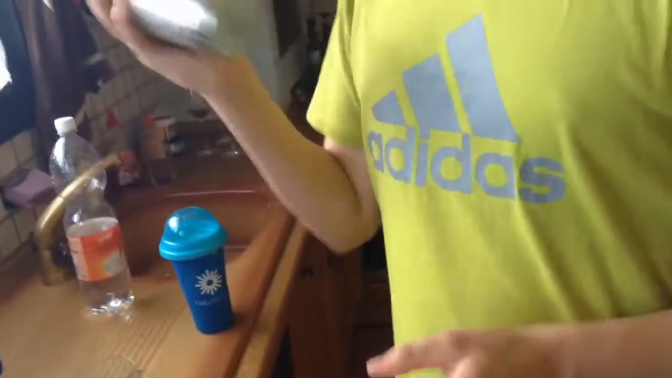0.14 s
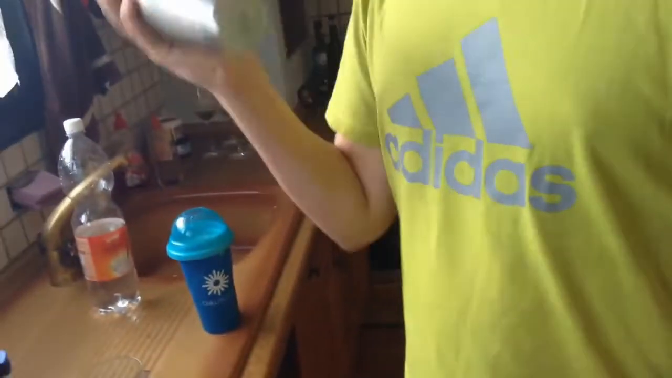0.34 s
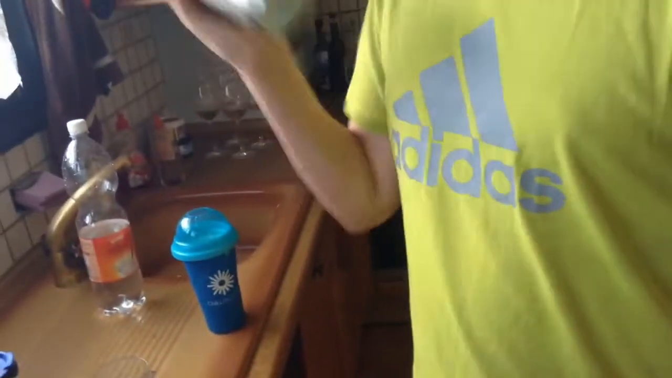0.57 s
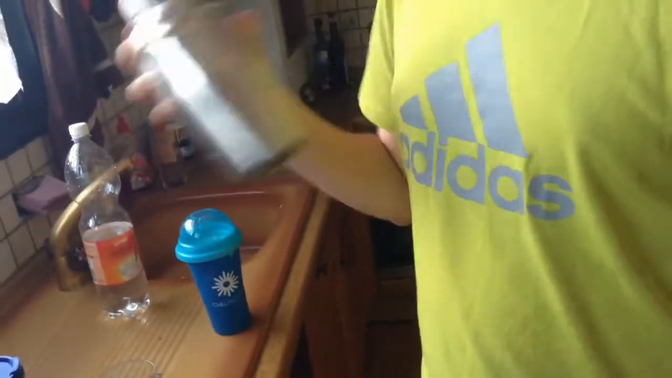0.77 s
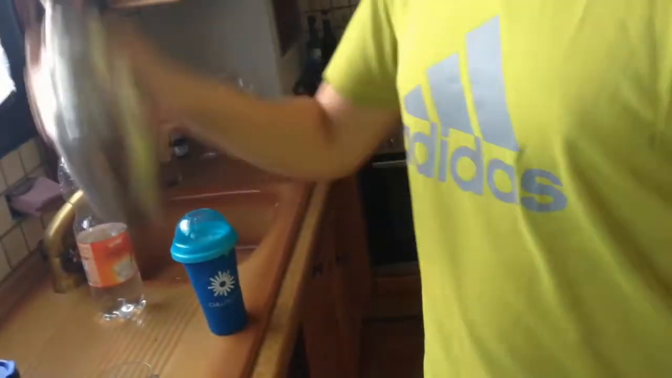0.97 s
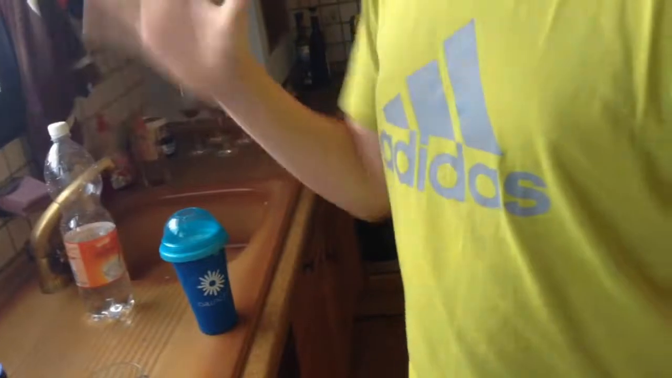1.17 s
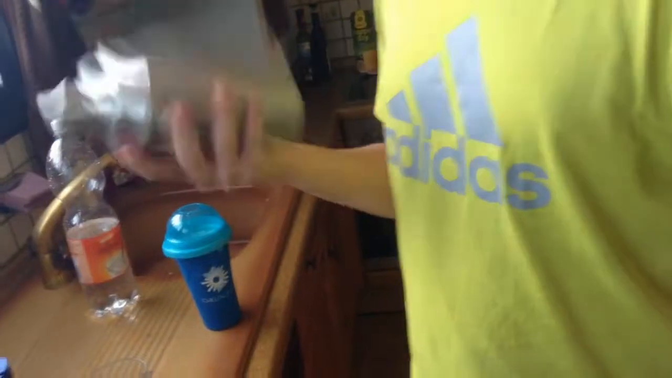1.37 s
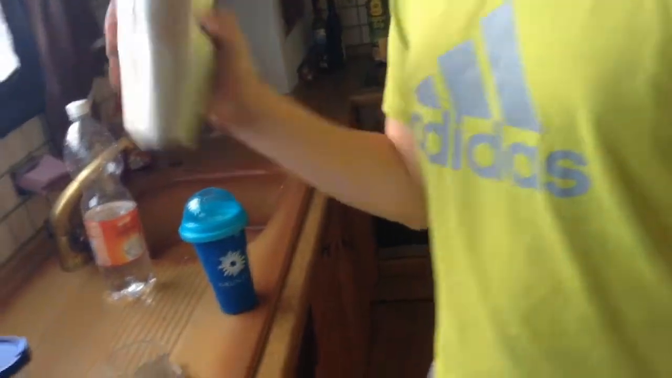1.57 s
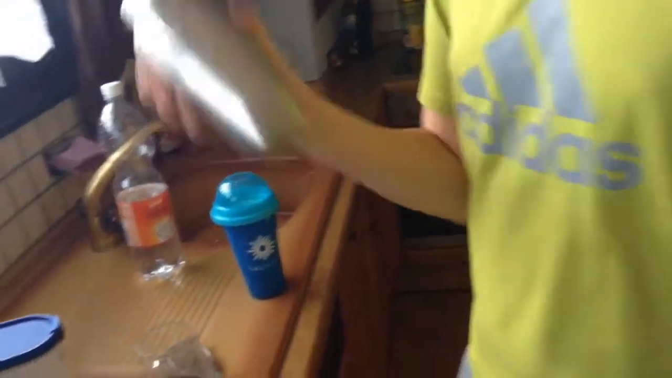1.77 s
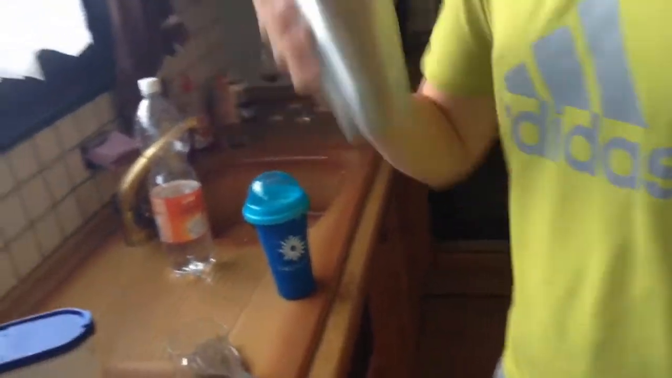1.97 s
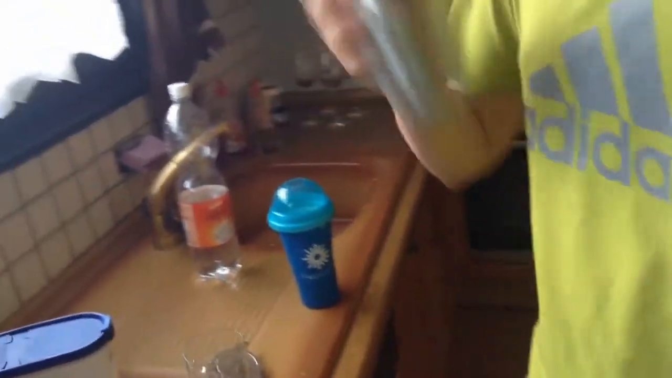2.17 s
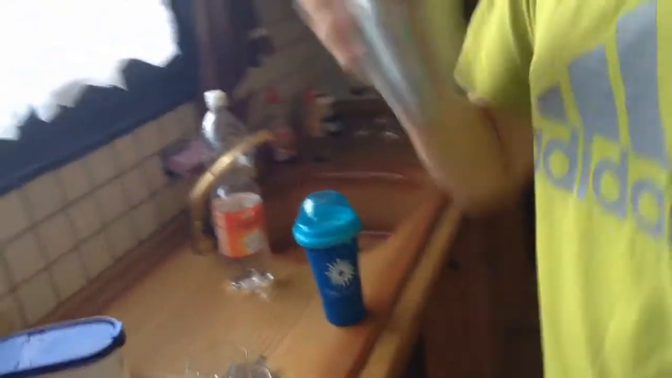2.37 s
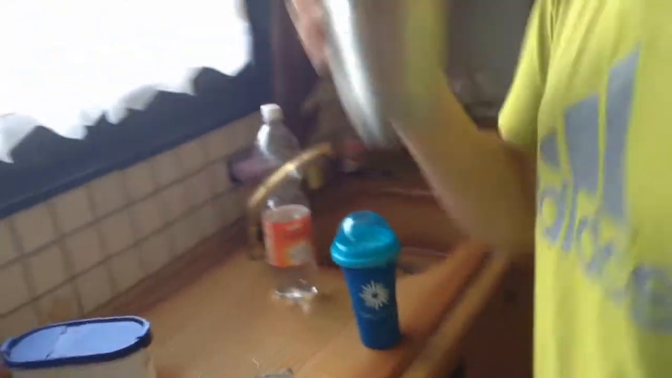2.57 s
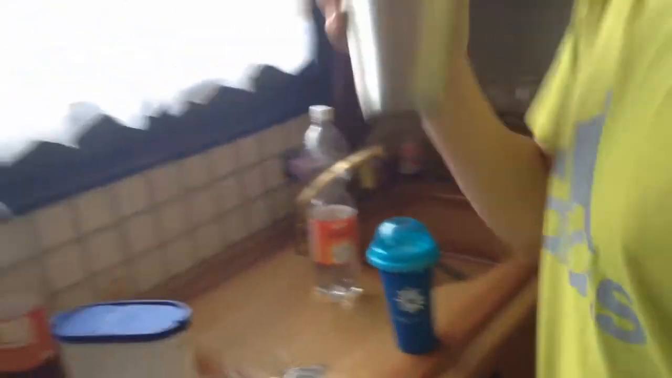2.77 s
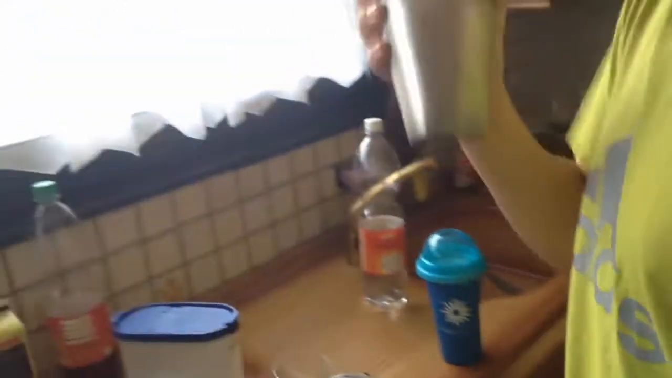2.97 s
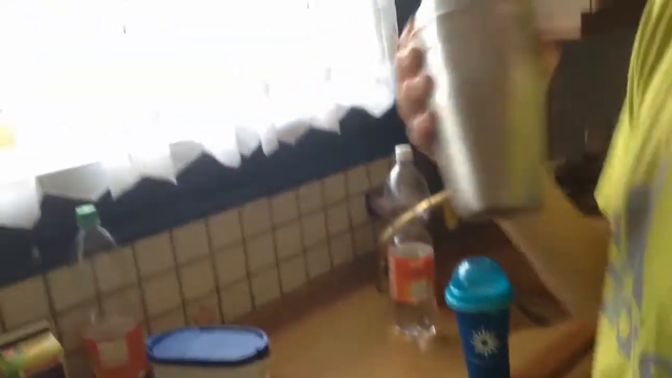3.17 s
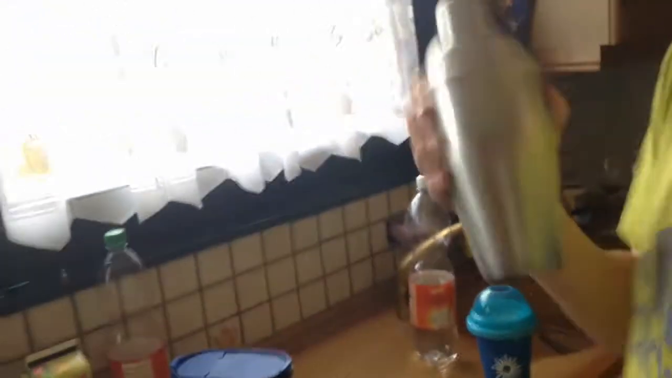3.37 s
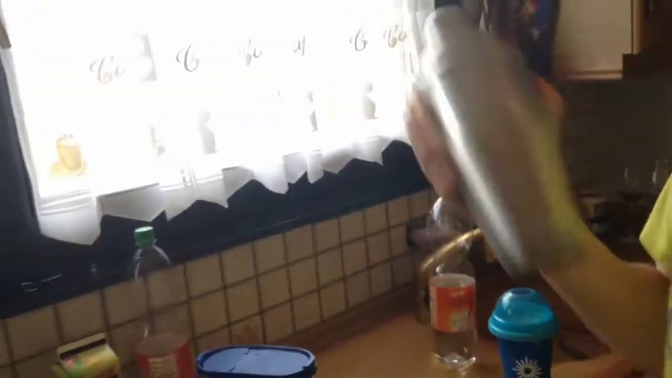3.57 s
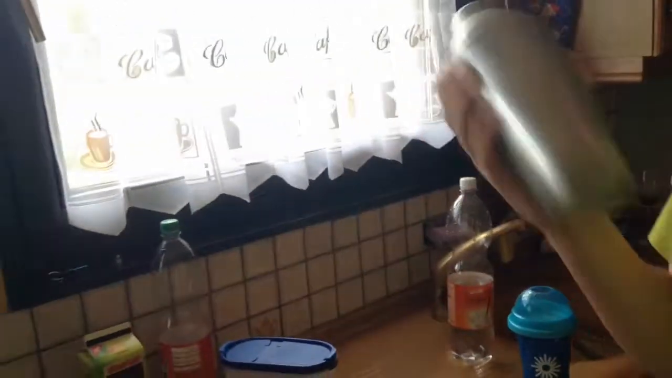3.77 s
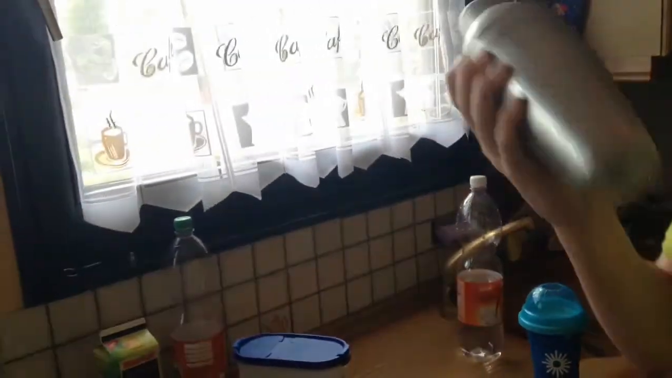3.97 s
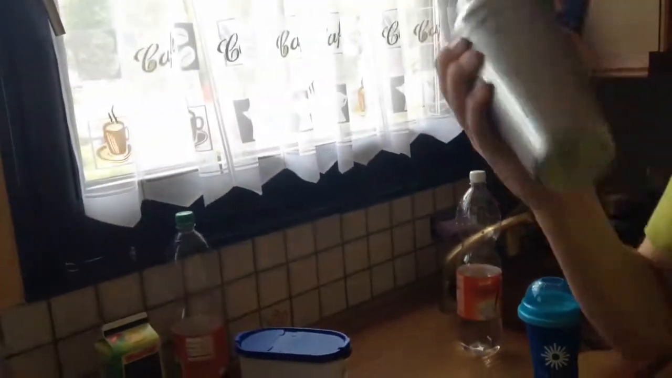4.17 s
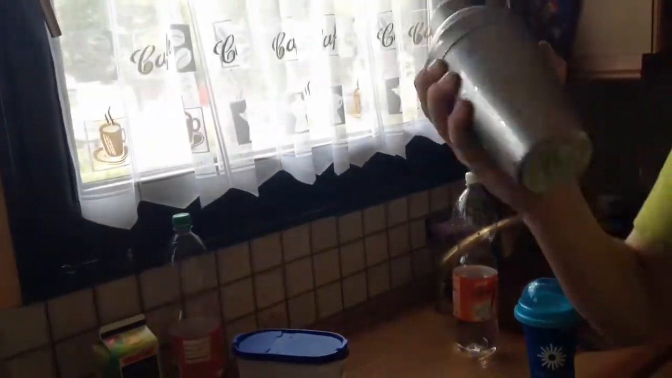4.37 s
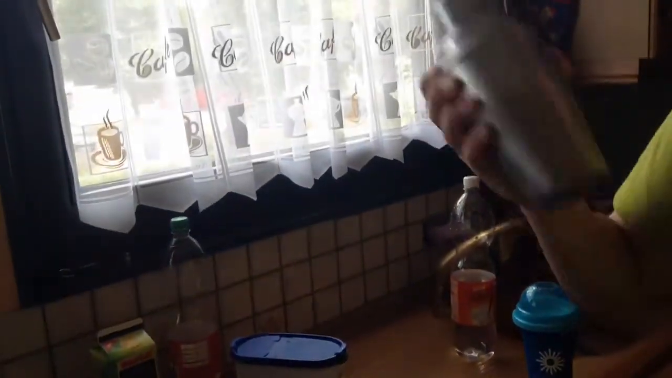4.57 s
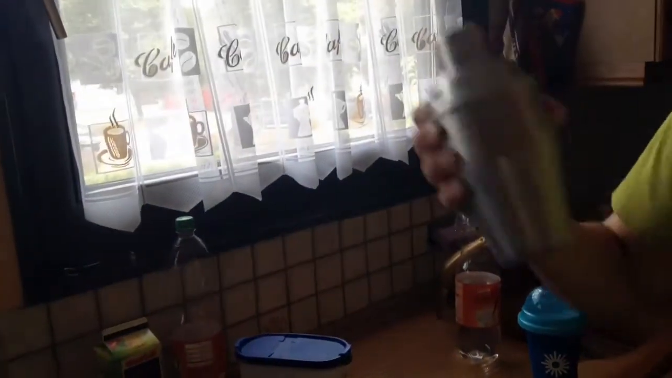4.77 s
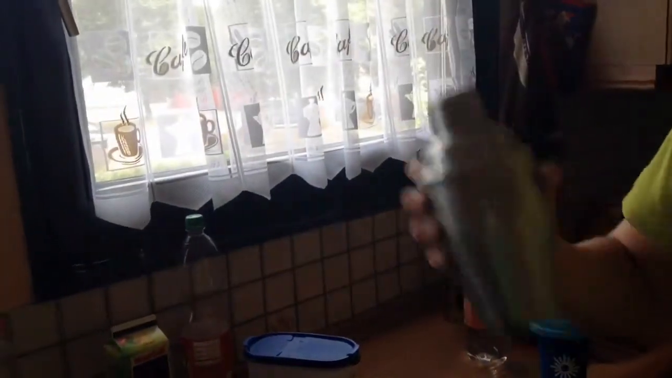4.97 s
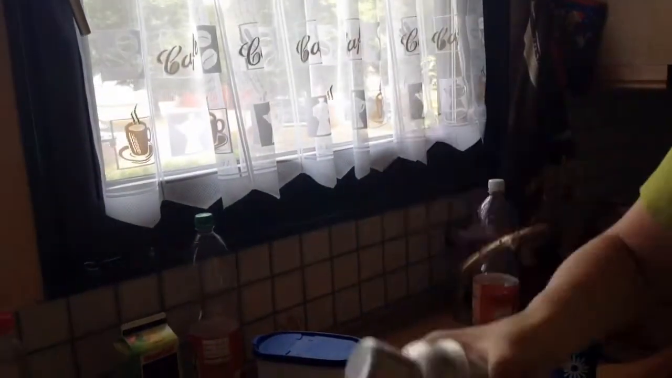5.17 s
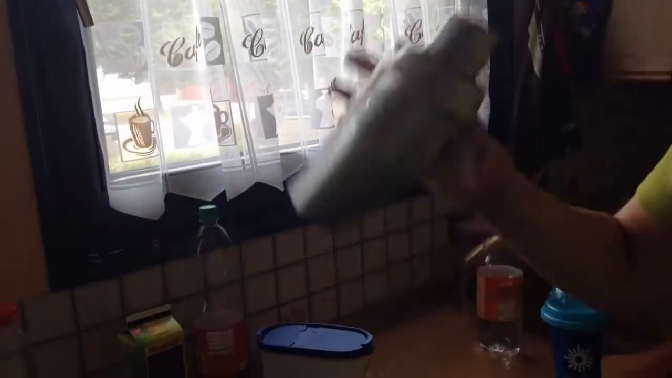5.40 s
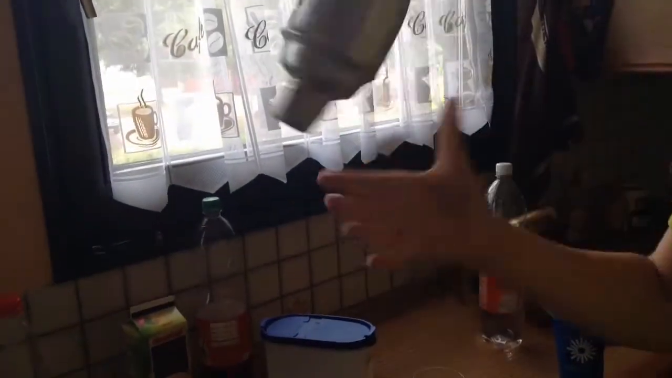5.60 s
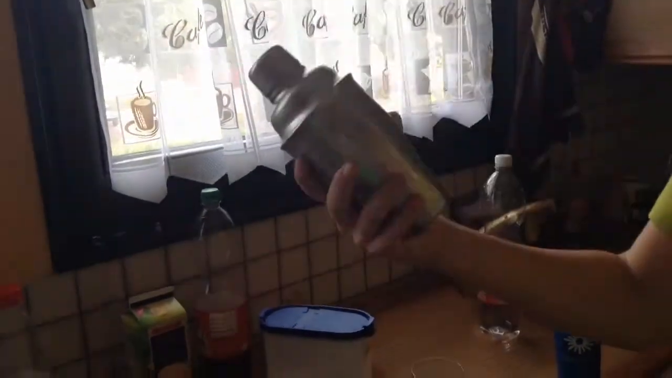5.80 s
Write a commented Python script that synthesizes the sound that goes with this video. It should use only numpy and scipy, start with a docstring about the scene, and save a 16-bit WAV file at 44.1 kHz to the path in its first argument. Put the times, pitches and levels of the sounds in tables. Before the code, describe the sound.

Close up in a small tiled kitchen, ice cubes knock rapidly inside a hand-held steel shaker, with dull short rings, bright slushy hiss and faint sloshing. The rattle drops away just after one second, a soft palm catch follows, then shaking resumes harder and denser. It stops near five and a half seconds, and a last catch lands with a clack. The microphone is near, thin in the bass.

```python
"""A small tiled kitchen, where ice cubes are thrown about in a hand-held steel cocktail shaker.
Each blow rings the hand-damped wall for a few milliseconds as short decaying sines and stirs up lesser
knocks and bursts of bright noise, the slush. At the end of a stroke the load lands on the base (low modes)
and sloshes (flickering noise). Twice the shaker is caught in the palm with a soft noise thump.
A tile echo, room echoes and a faint room tone surround it; a limiter holds the peaks."""
import sys
import numpy as np
from scipy import signal
from scipy.io import wavfile
from scipy.ndimage import uniform_filter1d, minimum_filter1d

SR = 44100
rng = np.random.default_rng(int(sys.argv[2]) if len(sys.argv) > 2 else 0)


def generate_wav(signal):
    """Clip the signal to [-1, 1] and save it as 16-bit WAV at the path in sys.argv[1]."""
    frames = np.transpose(np.atleast_2d(signal))
    scaled = np.clip(frames, -1, 1) * 32767
    pcm = np.round(scaled).astype(np.int16)
    wavfile.write(sys.argv[1], SR, pcm)


N = 257544


def from_db(db):
    """Amplitude factor of a level in dB."""
    return 10 ** (np.asarray(db) / 20)


def power_db(power):
    """Level in dB of a power."""
    return 10 * np.log10(power)


def rms_one(x):
    """Scale to rms 1."""
    return x / np.sqrt(np.mean(x ** 2) + 1e-20)


def at_hz(points, hz):
    """Read a (Hz, value) table on a logarithmic frequency axis."""
    table_hz, values = np.transpose(points)
    return np.interp(np.log(hz), np.log(table_hz), values)


def filtered(x, order, hz, kind):
    """Butterworth filter."""
    return signal.sosfilt(signal.butter(order, hz, kind, fs=SR, output="sos"), x)


def bands(low_hz, size):
    """Half-octave bands of noise with their centres; neighbours come from unrelated draws."""
    edges_hz = low_hz * 2 ** np.arange(0, np.log2(14500 / low_hz), 0.5)
    white = rng.standard_normal((2, size))
    for k, edge_hz in enumerate(edges_hz):
        band = filtered(white[k % 2], 2, [edge_hz, edge_hz * np.sqrt(2)], "band")
        yield edge_hz * 2 ** 0.25, band


def drift(rate_hz):
    """Slow chance: straight lines between random knots of spread 1, rate_hz knots a second."""
    knots = rng.standard_normal(int(N / SR * rate_hz) + 2)
    return np.interp(np.arange(N) / SR * rate_hz, np.arange(len(knots)), knots)


def coloured(spectrum, patchy_db, rate_hz):
    """Noise of a given colour whose bands flicker, partly together; rms 1."""
    together = drift(rate_hz)
    total = 0
    for hz, band in bands(60.0, N):
        flicker_db = patchy_db * (together + drift(rate_hz))
        total = total + from_db(at_hz(spectrum, hz) + flicker_db) * band
    return rms_one(total)


def dying(events, level_db, t60_s, way=1):
    """Power that jumps at every event and dies away after it (way -1: before it)."""
    kicks = np.zeros(N) + 1e-18
    for s, peak_db in events:
        kicks[int(s * SR)] += from_db(2 * (peak_db + level_db))
    return signal.lfilter([1], [1, -from_db(-120 / (t60_s * SR))], kicks[::way])[::way]


# Room tone colour. Each row: frequency in Hz, relative density in dB per Hz.
ROOM_TONE_COLOUR = [(60, -19), (120, -2.5), (350, -6.5), (1000, -7), (2000, 2.5), (5000, -25), (15000, -53)]


def room_tone():
    """Steady background noise, strongest around 2 kHz, with slowly flickering bands."""
    return from_db(-55.5) * coloured(ROOM_TONE_COLOUR, patchy_db=2.5, rate_hz=8.0)


# Decay of the kitchen. Each row: frequency in Hz, t60 in s.
KITCHEN_DECAY = [(250, 0.25), (700, 0.15), (2000, 0.52), (4000, 0.33), (9000, 0.31), (15000, 0.11)]


def kitchen(x, patterns=7):
    """Dense noise echoes dying band by band; the moving shaker excites ever another echo pattern."""
    t = np.arange(SR // 2) / SR
    shares = np.array([from_db(29.3 * drift(16.0)) for _ in range(patterns)])
    shares /= np.sqrt(np.sum(shares ** 2, axis=0))
    out = 0
    for share in shares:
        tail = sum(band * from_db(-60 * t / at_hz(KITCHEN_DECAY, hz)) for hz, band in bands(90.0, len(t)))
        tail = tail * np.clip((t - 0.0015) / 0.003, 0, 1)   # echoes fade in from 1.5 to 4.5 ms
        tail = tail / np.sqrt(np.sum(tail ** 2))
        out = out + signal.oaconvolve(share * x, tail)[:N]
    return out


def tile_echo(x):
    """One echo from the nearest tiled wall."""
    lag = int(0.005 * SR)
    return from_db(-13.5) * np.concatenate([np.zeros(lag), x[:-lag]])


# Shaker caught in the palm. Each row: start in s, level in dB, t60 in s.
PALM_CATCHES = [(1.368, -38.5, 0.21), (5.745, -35.5, .35)]
# Passband of the thump: lower and upper edge in Hz.
PALM_BAND_HZ = [160, 270]


def catches():
    """Skin on steel: a soft lumpy thump of decaying low noise."""
    t = np.arange(N) / SR
    low = rms_one(filtered(rng.standard_normal(N), 2, PALM_BAND_HZ, "band"))
    envelope = 0
    for s, level_db, t60_s in PALM_CATCHES:
        envelope = envelope + (t > s) * from_db(level_db - 60 * np.abs(t - s) / t60_s)
    return low * envelope


# Slosh colour. Each row: frequency in Hz, relative density in dB per Hz.
SLOSH_COLOUR = [(100, -38), (160, -26.5), (240, -11), (400, -13.5), (700, 1.5), (1100, -8.5), (1800, -18)]
SPLASH_DB, SPLASH_T60_S = -18, 0.32   # over the landing's strength


def slosh(stroke_db):
    """Flickering noise of the moving load; it swells at every landing and dies away."""
    level_db = power_db(from_db(2 * stroke_db) + dying(BASE_LANDINGS, SPLASH_DB, SPLASH_T60_S))
    return from_db(level_db) * coloured(SLOSH_COLOUR, patchy_db=4.0, rate_hz=31.0)


# Slush colour. Each row: frequency in Hz, relative density in dB per Hz.
SLUSH_COLOUR = [(1200, -27.5), (3000, 4), (5500, -1.5), (8000, 4.5), (11000, -5), (14000, -2)]
TICKS_PER_S, TICK_SPREAD_DB, TICK_T60_S = 810, 7, 0.0095
SPRAY_DB, SPRAY_T60_S = -0.5, 0.19   # chips thrown up by a blow, over its crack
SLUSH_DB = -5.5   # over the rattle


def slush(vigour_db):
    """Ice chips tick on the steel: short bursts of bright noise, more after a blow's crack."""
    spray = dying(np.array(CUBE_BLOWS)[:, [0, 4]], SPRAY_DB, SPRAY_T60_S)
    level_db = power_db(from_db(2 * vigour_db) + spray) + SLUSH_DB
    sizes = from_db(TICK_SPREAD_DB * np.minimum(rng.exponential(1, N), 4.0))
    ticks = sizes * (rng.random(N) < TICKS_PER_S / SR)
    bursts = signal.lfilter([1], [1, -from_db(-60 / (TICK_T60_S * SR))], ticks)
    return from_db(level_db) * rms_one(bursts * coloured(SLUSH_COLOUR, patchy_db=4.0, rate_hz=33.0))


# Upper ring modes. Each row: frequency in Hz, relative level in dB, t60 in s.
UPPER_MODES = [(3085, -4.5, 0.015), (4000, 0, 0.015), (4515, 0.5, 0.0045)]
# Crack modes. Each row: frequency in Hz, relative level in dB, t60 in s.
CRACK_MODES = [(5490, -5.5, 0.0085), (7840, -3.5, 0.0052), (9630, -5, 0.0032), (13400, 15, 0.00072),
               (14900, -11, 0.0098)]
# Body thud modes. Each row: frequency in Hz, relative level in dB, t60 in s.
THUD_MODES = [(262, -24, 0.0072), (720, -7, 0.029), (1020, -2, 0.0011), (1340, 4, 0.0045)]
WALL_T60_S, CONTACT_S = 0.013, 0.00012   # CONTACT_S: time constant of the attack


def shaker(hits, scatter_db, detune):
    """Every hit rings all modes; grip and load shift their pitch and strength from hit to hit."""
    s, wall_hz, *group_db = np.transpose(hits)   # groups: wall, upper, crack, thud
    at = (s * SR).astype(int)
    out = np.zeros(N + SR)
    modes = [(0, (wall_hz, 0, WALL_T60_S))]
    for group, table in enumerate((UPPER_MODES, CRACK_MODES, THUD_MODES), 1):
        modes += [(group, mode) for mode in table]
    luck = rng.standard_normal((len(at), len(modes), 3))   # strength, pitch, phase
    luck[:, 0, :2] = 0   # wall ring exactly as given
    for k, (group, (hz, level_db, t60_s)) in enumerate(modes):
        n = np.arange(int(t60_s * SR))
        strength = from_db(group_db[group] + level_db + scatter_db * luck[:, k, 0])
        turn = 2 * np.pi * hz * np.exp(detune * luck[:, k, 1]) / SR
        shape = from_db(-60 * n / len(n)) * (1 - np.exp(-n / (CONTACT_S * SR)))
        phase = 2 * np.pi * luck[:, k, 2:]
        rings = strength[:, None] * shape * np.sin(turn[:, None] * n + phase)
        out += np.bincount((at[:, None] + n).ravel(), rings.ravel(), len(out))
    return out[:N]


# Colour of a small knock: relative levels in dB of wall, upper ring, crack, thud.
KNOCK_GROUPS_DB = [7, 0, -13.5, -13]
KNOCKS_PER_S, KNOCK_SPREAD_DB, KNOCK_HZ = 150, 5.5, 2097
STIR_DB, STIR_T60_S = -13.5, 0.12   # knocks a blow leaves behind, over its wall ring
KNOCK_DB = -9.5   # over the rattle


def knocks(vigour_db):
    """Small knocks at random moments, many weak and a few strong, louder after a blow."""
    stir = dying(np.array(CUBE_BLOWS)[:, :2], STIR_DB, STIR_T60_S)
    level_db = power_db(from_db(2 * vigour_db) + stir) + KNOCK_DB
    s = np.flatnonzero(rng.random(N) < KNOCKS_PER_S / SR) / SR
    luck = rng.standard_normal((len(s), 5))
    size_db = KNOCK_SPREAD_DB * np.minimum(rng.exponential(1, (len(s), 1)), 1.9)
    wall_hz = KNOCK_HZ * np.exp(0.063 * luck[:, 0])
    group_db = size_db + KNOCK_GROUPS_DB + 8.2 * luck[:, 1:]
    hits = np.column_stack([s, wall_hz, group_db])
    return from_db(level_db) * rms_one(shaker(hits, scatter_db=3.0, detune=0.043))


# Load landing on the base at the end of a stroke. Each row: start in s, relative strength in dB.
BASE_LANDINGS = [(0.065, -14), (0.145, -37), (0.272, -16.5), (0.73, -17), (0.97, -24.5), (1.371, -24),
                 (1.469, -19.5), (1.627, -18.5), (1.775, -19.5), (1.914, -17), (2.168, -35), (2.281, -19.5),
                 (2.329, -18), (2.462, -32), (2.592, -9.5), (2.784, -17.5), (2.867, -13.5), (3.215, -15),
                 (3.398, -15.5), (3.665, -36), (4.266, -21.5), (4.379, -31), (4.474, -32), (4.547, -26),
                 (4.765, -27), (5.15, -40), (5.747, -11.5), (5.761, -17.5)]
BASE_LAG_S, LANDING_DB = 0.00201, 1.5   # LANDING_DB: over the strength column


def landings():
    """The whole load on the heavy base sounds the low modes only, a little late."""
    silent_db = -np.inf
    hits = [(s + BASE_LAG_S, KNOCK_HZ, silent_db, silent_db, silent_db, strength_db + LANDING_DB)
            for s, strength_db in BASE_LANDINGS]
    return shaker(hits, scatter_db=3.0, detune=0.024)


# Cube on wall. Each row: start in s, wall ring in relative dB, wall ring in Hz,
# upper ring in relative dB, crack in relative dB.
CUBE_BLOWS = [(0.0024, -12.5, 2120, -19, -19.5), (0.0308, -6.5, 2060, -19, -21),
              (0.0593, -10.5, 2320, -28, -18.5), (0.1482, -12, 1900, -24, -24),
              (0.1986, -6, 2040, -14.5, -24), (0.2374, -7.5, 2110, -21, -18), (0.2727, -10, 2040, -24, -13),
              (0.402, -9, 2050, -27.5, -24), (0.4599, -13, 2050, -28, -19.5), (0.488, -8, 2000, -26, -21),
              (0.5215, -6.5, 2140, -35, -23), (0.5796, -11.5, 1900, -16, -17),
              (0.6072, -15, 1920, -15.5, -13.5), (0.6336, -9, 2040, -22, -14),
              (0.6764, -11.5, 2010, -36, -21), (0.7064, -5.5, 2080, -21, -22), (0.7308, 1, 2010, -16, -16),
              (0.8347, -17, 2090, -26, -17.5), (0.9021, -12.5, 2010, -18, -17),
              (0.9563, -11.5, 2030, -24, -17), (0.9704, -12, 2160, -23, -23), (1.0171, -17, 2090, -33, -24),
              (1.0805, -18.5, 2130, -28, -33), (1.1836, -38, 2000, -44, -65), (1.3332, -34, 2040, -56, -64),
              (1.3705, -26.5, 1800, -35, -25.5), (1.3849, -24, 1770, -33, -30),
              (1.4066, -24.5, 1920, -35, -25.5), (1.4709, -22, 2120, -34, -28),
              (1.4763, -9.5, 2000, -33, -33), (1.6182, -17, 2100, -31, -26.5),
              (1.6302, -5.5, 2110, -35, -20.5), (1.6624, -26, 2070, -29, -18.5),
              (1.725, -14, 2190, -27, -18), (1.7734, -5, 2270, -19, -15), (1.8158, -9, 1950, -24, -33),
              (1.9158, -10, 1810, -18, -14.5), (1.9516, -6, 2470, -13, -7.5),
              (1.9637, -0.5, 2060, -17, -11.5), (1.9921, -5, 2140, -14, -17),
              (2.1064, -5.5, 2170, -27, -14.5), (2.1264, -11, 2130, -42, -9), (2.173, -3, 2050, -28, -26),
              (2.2022, -9, 2310, -10, -18), (2.283, -2.5, 2130, -13, -25), (2.3315, -7.5, 2000, -12, -14),
              (2.385, -2, 2290, -19, -6), (2.4618, 0.5, 2044, -25, -28), (2.5674, -2.5, 2080, -14, -11.5),
              (2.5924, -12, 2100, -20, -7), (2.6164, -7, 2000, -18, -12), (2.6975, -9.5, 2120, -10, -9.5),
              (2.7856, -16, 2090, -10, -16), (2.803, -8.5, 2220, -13, -18), (2.8184, -13, 2180, -17, -14),
              (2.8722, -12.5, 2670, -22, -24), (2.9731, -14, 2200, -27, -13),
              (3.0026, -2.5, 2510, -23, -26), (3.1274, -13, 2130, -24, -15.5), (3.1684, -8, 2050, -25, -24),
              (3.2161, -27, 2090, -20, -17), (3.3849, -5, 2180, -16, -13.5), (3.4221, -5, 2140, -18, -11),
              (3.4384, -14, 2320, -13, -13), (3.4973, -18, 2140, -11, -14), (3.6104, -27, 2320, -13.5, -32),
              (3.6277, -11.5, 2450, -16, -31), (3.6647, -5, 2160, -9.5, -18),
              (3.7546, -12.5, 2830, -13, -10), (3.8208, -34, 3000, -19, -17), (3.8482, -14, 3080, -18, -25),
              (3.8855, -22, 2080, -25, -23), (3.9894, -28, 2860, -18.5, -18), (4.0324, -27, 2080, -32, -18),
              (4.0423, -30, 2190, -26, -16.5), (4.0767, -10, 2550, -27, -16.5),
              (4.0955, -6.5, 2660, -25, -19), (4.1691, -10, 2080, -14, -14),
              (4.1773, -11.5, 2910, -17, -14.5), (4.267, -4.5, 2150, -14, -20),
              (4.3291, -10, 2660, -25, -30), (4.3784, -2.5, 2070, -10, -16),
              (4.44, -13.5, 2080, -20, -21.5), (4.477, -13, 2100, -18.5, -16.5),
              (4.497, -26, 2070, -23, -19), (4.5486, -12.5, 2610, -16, -13),
              (4.5874, -18, 2220, -20, -14.5), (4.6199, -17, 2000, -11.5, -20),
              (4.7065, -12.5, 2200, -20, -20), (4.7326, -5, 2520, -17, -16),
              (4.8336, -7.5, 2130, -18.5, -18.5), (4.8879, -7.5, 2220, -21, -14),
              (4.9387, -6, 2600, -13, -16), (4.9425, -7, 2220, -18, -12), (5.0305, -12, 2100, -20, -11.5),
              (5.0479, -8, 2230, -21, -25), (5.0699, -16, 2000, -17, -21), (5.0815, -22, 2620, -14, -14.5),
              (5.1542, -6, 2070, -15, -10.5), (5.1711, -30, 2130, -22, -17), (5.251, -13, 2650, -18, -14),
              (5.3403, -21, 2050, -35, -27), (5.3847, -25, 2140, -21, -23.5), (5.4632, -13, 2100, -16, -22),
              (5.6411, -35.5, 2200, -48, -57), (5.7498, -13, 2080, -22.5, -12.5),
              (5.7608, -13, 2340, -29, -33)]
WALL_DB, UPPER_DB, CRACK_DB, BODY_DB = 4, 5.5, 9.5, -24.5   # over the columns; body over wall ring


def blows():
    """The hard blows; a corner cracks, a flat face rings the wall, the body follows faintly."""
    s, wall_db, wall_hz, upper_db, crack_db = np.transpose(CUBE_BLOWS)
    hits = np.column_stack([s, wall_hz, wall_db + WALL_DB, upper_db + UPPER_DB,
                            crack_db + CRACK_DB, wall_db + BODY_DB])
    return shaker(hits, scatter_db=1.5, detune=0.046)


# The shaking. Each row: time in s, vigour as rattle level in dB, slosh level in dB,
# room over direct sound in dB as the shaker turns and moves.
SHAKING = [(0.0, -16, -37.5, -2), (0.39, -29, -39.5, -1.5), (0.68, -20, -41, -4), (0.81, -21, -41, -2),
           (0.93, -35, -45, -4.5), (1.15, -68, -50.5, -5), (1.41, -66, -62.5, -1), (1.56, -30, -52, -3.5),
           (1.77, -27, -47, -1.5), (1.85, -21.5, -41, -2), (2.2, -11, -35.5, -5), (2.5, -21.5, -40, -1),
           (2.91, -12.5, -44, -5.5), (3.12, -18, -38, -2), (3.33, -14, -43, -2), (3.61, -17, -43, -4.5),
           (3.71, -15.5, -42, 0), (3.84, -23, -52.5, -4), (4.06, -26, -45.5, -1.5),
           (4.26, -19.5, -48, -2.5), (4.42, -24, -44, -2), (5.07, -23.5, -50, -5), (5.25, -27.5, -49, -3.5),
           (5.37, -39, -53.5, -8), (5.51, -61, -67, -7), (5.84, -58, -49, -2.5)]
FLIGHT_DB, FLIGHT_T60_S = -6.5, 0.15   # over the coming blow's wall ring
STEEL_RADIATES_ABOVE_HZ, BASE_RADIATES_ABOVE_HZ = 786, 310


def scene():
    """Room tone and room around the shaker; so small a body sends out hardly any bass."""
    s, *columns = np.transpose(SHAKING)
    vigour_db, stroke_db, room_db = (np.interp(np.arange(N) / SR, s, column) for column in columns)
    # the rattle thins while the ice flies towards a blow
    coming = dying(np.array(CUBE_BLOWS)[:, :2], FLIGHT_DB, FLIGHT_T60_S, way=-1)
    vigour_db = vigour_db - power_db(1 + coming / from_db(2 * vigour_db))
    steel = filtered(slush(vigour_db) + knocks(vigour_db) + blows(), 3, STEEL_RADIATES_ABOVE_HZ, "high")
    base = filtered(landings(), 2, BASE_RADIATES_ABOVE_HZ, "high")
    near = catches() + slosh(stroke_db) + base + steel
    return (room_tone() + kitchen(from_db(room_db) * near) + tile_echo(near) + near)[None]


CEILING_DB, LOOK_AHEAD_S, RELEASE_DB_PER_S = -2.5, 0.00562, 316


def limiter(x):
    """The gain sinks just ahead of every peak over the ceiling and creeps back afterwards."""
    over_db = np.maximum(20 * np.log10(np.abs(x) + 1e-9) - CEILING_DB, 0)
    ramp_db = RELEASE_DB_PER_S * np.arange(N) / SR
    held_db = np.maximum.accumulate(over_db + ramp_db) - ramp_db
    ahead = int(LOOK_AHEAD_S * SR)
    early_db = -minimum_filter1d(-held_db, size=ahead, origin=-(ahead // 2))
    return x * from_db(-uniform_filter1d(early_db, size=31))


MIC_LOW_HZ, CUTOFF_HZ = 152, 15250


def record(dry):
    """The microphone drops the bass, a limiter holds the peaks, the top is cut."""
    limited = limiter(filtered(dry[0], 4, MIC_LOW_HZ, "high"))
    top_cut = signal.ellip(12, 0.5, 80, CUTOFF_HZ, fs=SR, output="sos")
    return signal.sosfilt(top_cut, limited)[None]


dry = scene()
out = record(dry)
generate_wav(out)
```